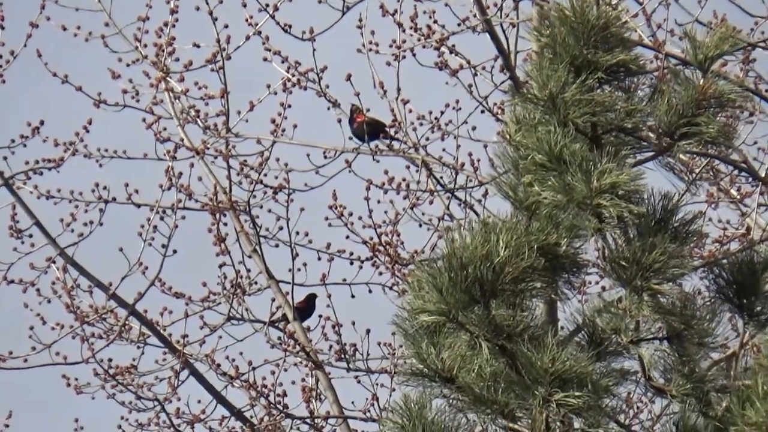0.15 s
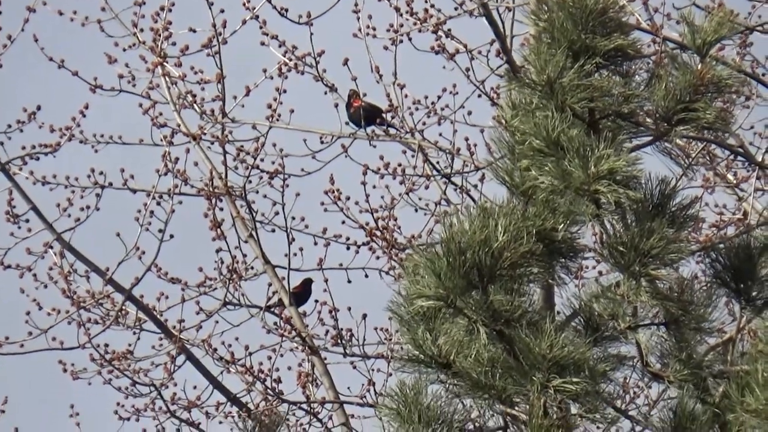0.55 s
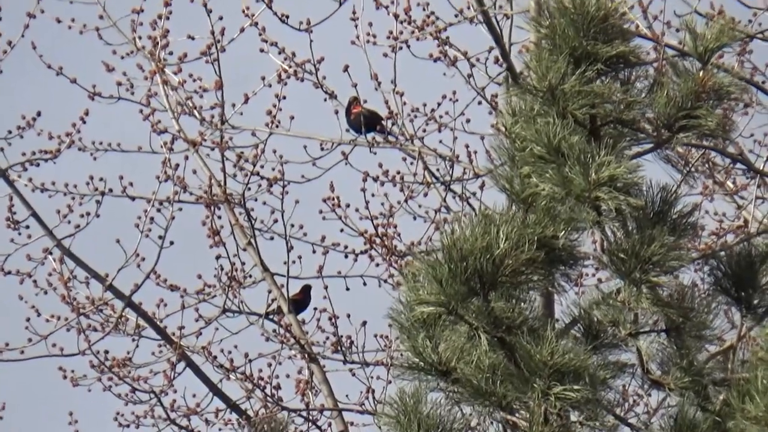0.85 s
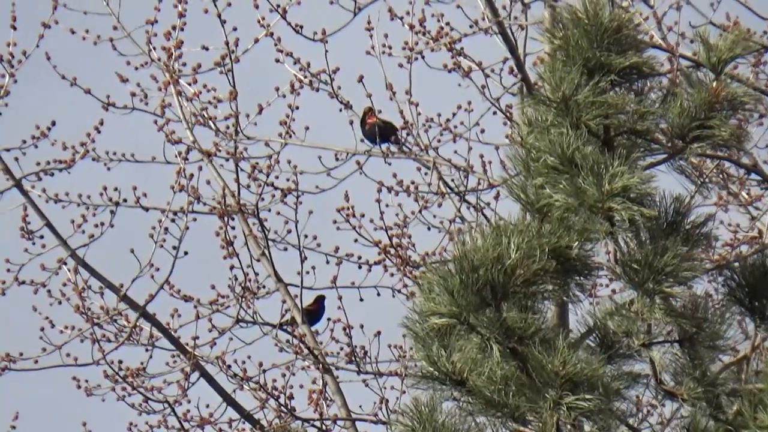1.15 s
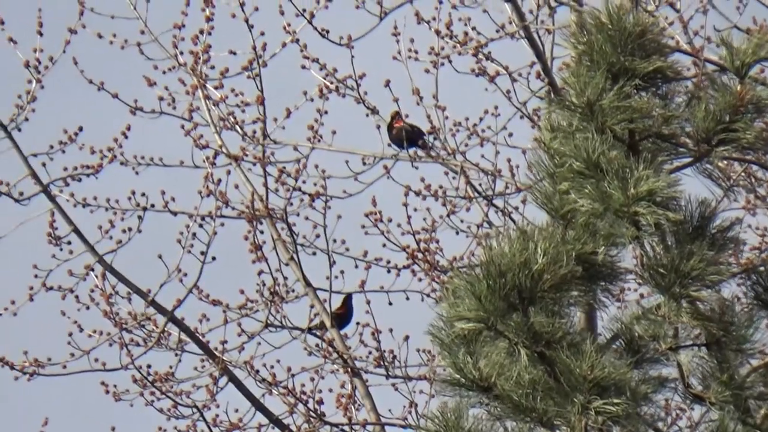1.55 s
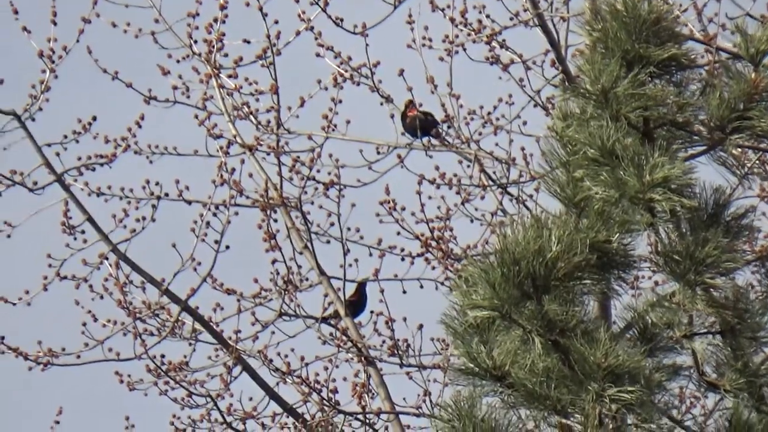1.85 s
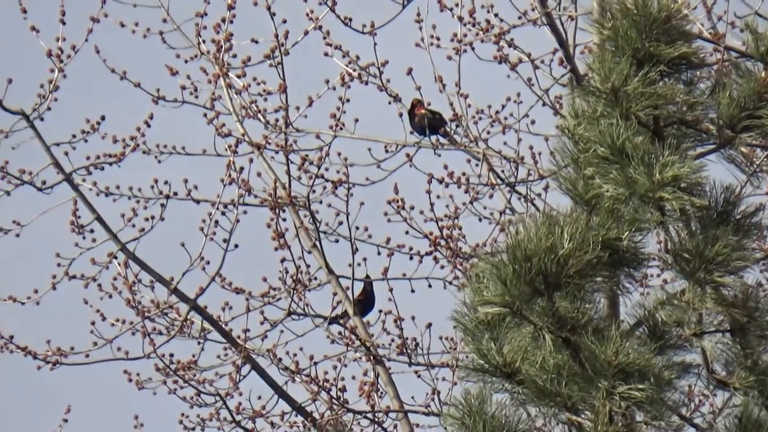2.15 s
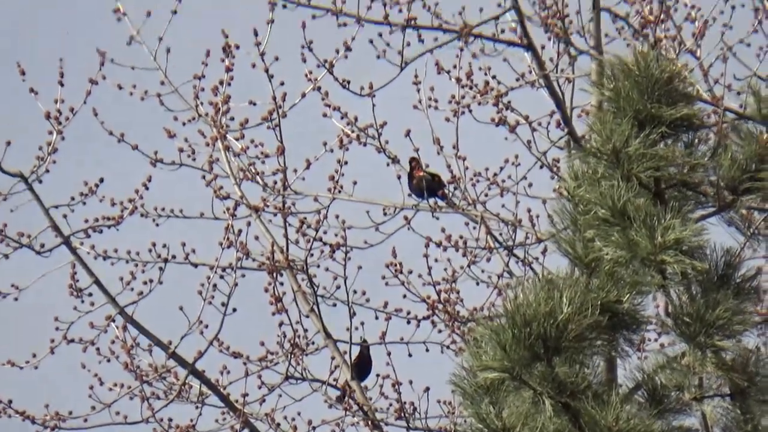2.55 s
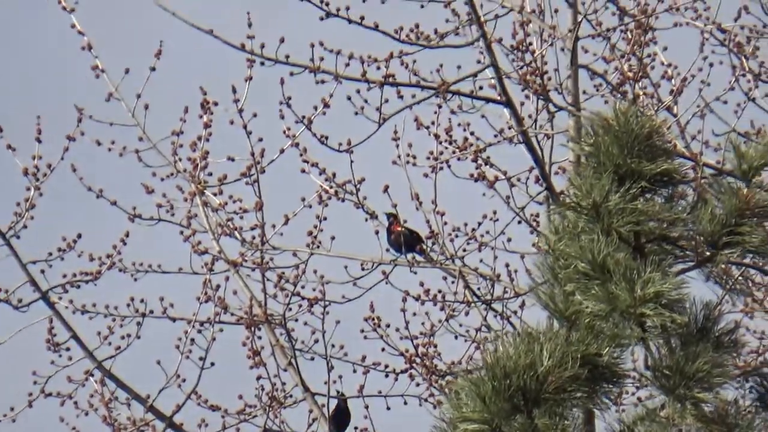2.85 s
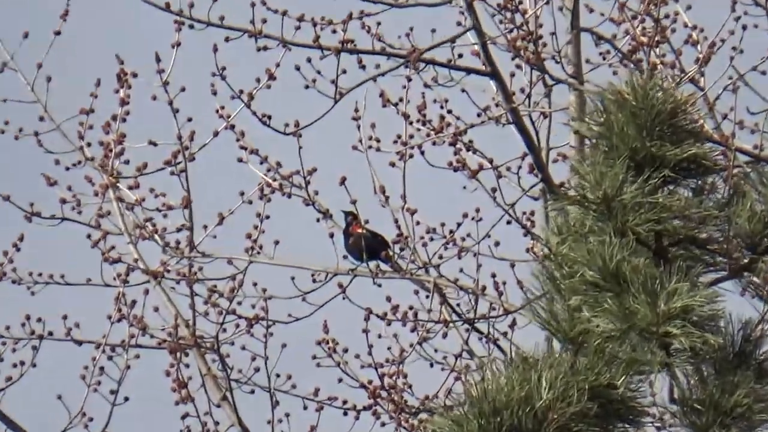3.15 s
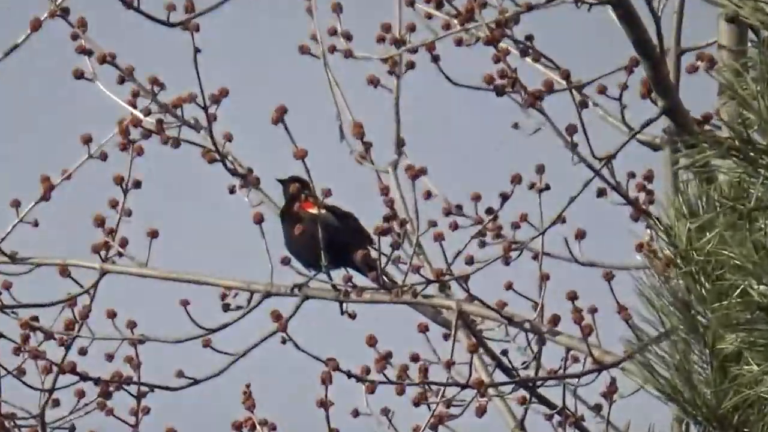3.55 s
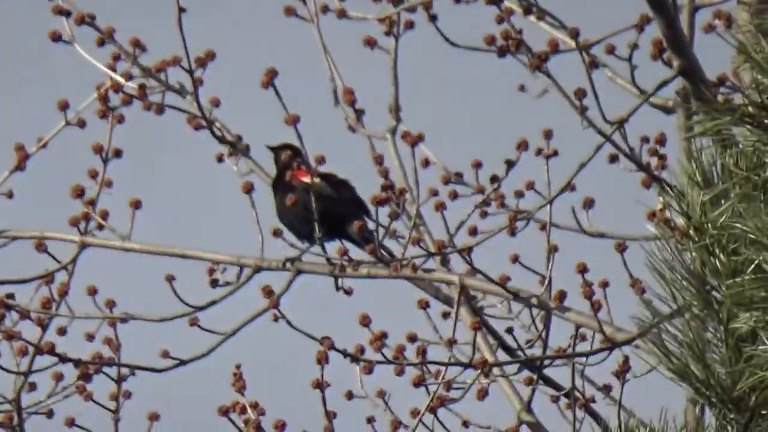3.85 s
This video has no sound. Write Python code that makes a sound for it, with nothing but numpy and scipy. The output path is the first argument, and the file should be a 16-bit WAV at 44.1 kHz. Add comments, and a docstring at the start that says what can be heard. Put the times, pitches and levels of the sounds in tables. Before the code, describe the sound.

A blackbird's buzzy trill ends abruptly, leaving faint distant traffic, a dry chuck and tiny clicks.

```python
"""A bare tree with a town around it: a red-winged blackbird ends its song, a little left of centre.
Quick glides lead to a buzzing trill of two swooping tones, coloured by close reflections and a faint tail.
Later come a dry chuck, a faint far call from a second bird and the start of a whistle, all gliding tones.
Shaped noise makes the traffic fading on the right, swelling tyres, rumble, hiss, thin whine and wind puffs.
A hand-held camera ticks a few times: decaying noise cracks, each with one broad ring."""
import sys
import numpy as np
from scipy import signal
from scipy.fft import rfft, irfft
from scipy.io import wavfile

SR = 44100
rng = np.random.default_rng(int(sys.argv[2]) if len(sys.argv) > 2 else 0)


def transcribe(u):
    """Save the signal u as a 16-bit wav file named by the first command-line argument.

    u: samples, shape (n,) or (channels, n), limited to [-1, 1]; the rate is SR.
    q: integer samples, one column per channel.
    """
    v = np.clip(np.atleast_2d(u).T, -1, 1)
    q = np.round(v * 32767).astype(np.int16)
    wavfile.write(sys.argv[1], SR, q)


N = 176400
TIME = np.arange(N) / SR  # s

# Town rumble: fader (t/s, level/dB), spectrum (f/Hz, level/dB), width (f/Hz, side-to-mid level/dB)
RUMBLE_LEVEL = [(0, -51), (.6, -50.5), (1.2, -54), (2, -54), (2.6, -54), (3.3, -54.5), (4, -53.5)]
RUMBLE_SPECTRUM = [(18, -72), (30, -36), (74, -14), (151, -9), (193, -3), (263, -3), (344, -6), (429, -9.5),
                   (816, -9.5), (1240, -11.5), (1330, -12), (1980, -15), (6000, -32), (7800, -48),
                   (13200, -120)]
RUMBLE_WIDTH = [(100, -18), (300, -18), (1000, -12), (4000, 1)]

# Microphone hiss: fader (t/s, level/dB), spectrum (f/Hz, level/dB), width (f/Hz, side-to-mid level/dB)
HISS_LEVEL = [(0, -55.5), (.7, -62), (1.3, -62.5), (1.9, -64.5), (2.6, -66.5), (3.1, -64.5), (3.4, -67),
              (3.7, -63), (4, -67.5)]
HISS_SPECTRUM = [(1000, -14.5), (3500, 2), (5500, -0.5), (7300, 2.5), (7900, 3), (9000, 3), (11000, -1.5),
                 (13000, -4), (15800, -6.5)]
HISS_WIDTH = [(3000, -17), (8000, -4.5), (11000, -37)]

# Thin camera whine, a narrow band: spectrum (f/Hz, level/dB)
WHINE_SPECTRUM = [(7400, -40), (7800, -6), (7900, 0), (8000, -6), (8400, -40)]
WHINE_DB = -79

# Distant traffic: fader (t/s, level/dB), spectrum (f/Hz, level/dB)
TRAFFIC_LEVEL = [(0, -50), (.5, -47.5), (.9, -48), (1.3, -50), (1.65, -52), (1.95, -54.5), (2.2, -55),
                 (2.6, -57.5), (3.2, -59.5), (3.6, -62), (4, -59)]
TRAFFIC_SPECTRUM = [(60, -15), (200, 1), (400, -1.5), (750, 3.5), (1150, -2), (1600, -12), (2200, -21.5),
                    (3500, -23.5), (6000, -26), (15000, -80)]
# Traffic placement: balance (f/Hz, left-to-right level/dB)
TRAFFIC_BALANCE = [(200, -0.5), (400, -2), (700, -1.5), (1250, -13), (2400, -29), (5000, -1)]
# Width of traffic and tyres: (f/Hz, side-to-mid level/dB)
ROAD_WIDTH = [(200, -25), (500, -11.5), (1000, -8.5), (4000, -0.5)]
TRAFFIC_WAVER_DB, TRAFFIC_WAVER_HZ = 0.38, 20  # spread and smoothing corner of the level waver

# Tyre noise swelling as cars pass: fader (t/s, level/dB), spectrum (f/Hz, level/dB)
TYRE_LEVEL = [(0, -61), (.7, -73), (1.1, -58), (1.65, -56), (1.95, -61.5), (2.15, -53), (2.45, -58.5),
              (2.8, -62.5), (3.5, -76), (4, -64)]
TYRE_SPECTRUM = [(300, -53), (800, -13.5), (1000, 0.5), (1160, 4), (1400, -5.5), (2000, -8), (2800, -51.5),
                 (8000, -44)]
TYRE_PAN_DB = -1.5  # left relative to right

# Wind puffs on the microphone: (t/s, half length/s, level/dB)
WIND_PUFFS = [(0.236, 0.048, -53.5), (.88, 0.048, -57.5), (1.181, 0.021, -51), (2.033, 0.037, -68),
              (2.7, 0.059, -61.5), (3.535, 0.033, -65.5), (3.645, 0.042, -59), (3.757, 0.014, -48.5)]
# Low tone of the puffs: spectrum (f/Hz, level/dB)
PUFF_SPECTRUM = [(20, -29), (50, -17), (85, -5.5), (125, -1), (180, -19), (400, -38), (2000, -80)]

# Camera ticks: (t/s, level/dB before the high cut, ring f/Hz, 60 dB decay/s)
CAMERA_TICKS = [(.7898, -36, 7900, .008), (1.3995, -39.5, 4800, .014), (1.465, -40, 4600, .014),
                (2.889, -46, 1600, .04), (2.956, -53, 4500, .025), (3.707, -53, 6500, .03)]
# Tone of the cracks: spectrum (f/Hz, level/dB)
TICK_SPECTRUM = [(300, -10), (2000, 1), (3500, -0.5), (10500, -3), (12500, -8), (16000, -3)]
TICK_RING_DB, TICK_RING_WIDTH_HZ = -4, 1200

# Far call of a second bird, dry: (t/s, length/s, start f/Hz, end f/Hz, level/dB)
FAR_GLIDES = [(3.652, .078, 2410, 2380, -60)]
# Whistles, dry: (t/s, length/s, start f/Hz, end f/Hz, level/dB)
WHISTLE_GLIDES = [(3.815, .085, 1250, 1260, -59), (3.928, .034, 2430, 2500, -41.5),
                  (3.945, .048, 2540, 2530, -44.5), (3.975, .035, 2390, 2370, -51),
                  (3.945, .03, 3790, 3810, -64)]
# Chuck in short rough strokes, dry: (t/s, length/s, start f/Hz, end f/Hz, level/dB)
CHUCK_GLIDES = [(2.003, 0.011, 3650, 3880, -45), (2.007, 0.0063, 4200, 4400, -36),
                (2.016, 0.0088, 4650, 4140, -38), (2.007, 0.015, 3060, 3100, -48),
                (2.02, 0.0175, 3950, 3560, -47.5), (2.024, .02, 4450, 4280, -52)]
# Opening glides of the song, before beak colour: (t/s, length/s, start f/Hz, end f/Hz, level/dB)
OPENING_GLIDES = [(-.004, 0.026, 2720, 2465, -36.5), (-.004, 0.024, 5200, 5200, -38.5),
                  (.018, 0.0071, 4640, 5530, -27), (.024, 0.0083, 3550, 3410, -25.5),
                  (.0315, .0045, 6000, 3180, -23.5), (.034, 0.0067, 3500, 4100, -32),
                  (.0415, .004, 5400, 3300, -24), (.045, 0.0053, 4500, 5290, -30),
                  (.0495, 0.00345, 5500, 3150, -20), (.052, 0.0053, 4900, 4440, -36),
                  (.028, 0.037, 2670, 2810, -41)]

# Upper voice in one trill note: (share of the cycle, f/Hz before the arch, relative level/dB)
UPPER_VOICE = [(0, 5476, -14), (.09, 5343, -2), (.14, 4485, 2.5), (.19, 3293, -4), (.24, 4706, -1),
               (.43, 5207, -4), (.52, 4380, 0), (.6, 3438, -3.5), (.7, 2607, -11.5), (.79, 2921, 4),
               (.87, 3592, -2.5), (.93, 4995, -4)]
# Lower voice in the same note: (share of the cycle, f/Hz, relative level/dB)
LOWER_VOICE = [(.03, 2884, 3), (.15, 2830, -43), (.3, 2536, -6), (.42, 2972, -12.5), (.57, 2722, -8.5),
               (.7, 2358, -9.5), (.86, 2416, -23), (.96, 2753, -4.5)]
# Song contour: (t/s, upper-voice pitch shift/semitones, relative level of both voices/dB)
SONG_ARCH = [(.06, -.6, 0), (.13, -.4, -1), (.2, .4, 0.5), (.3, 0.16, 0.5), (.43, -.1, -.5),
             (0.529, .1, 1.3), (0.618, -0.35, -0.5)]
TRILL_START_S, TRILL_END_S, ATTACK_S, RELEASE_S = .0564, 0.6357, 0.0049, 0.029
TRILL_RATE_HZ, SLOWING_HZ_PER_S = 68.67, 6.55  # note rate at the start and how fast it falls
TRILL_DB = -27  # base level, before contour and beak colour
UPPER_JITTER, LOWER_JITTER = .012, 0.0348  # pitch spread, share of the pitch
TIMING_JITTER, FLUTTER_DB = .008, 1.2  # spread of the timing in cycles, and of the level
SECOND_DB, THIRD_DB = -27, -27  # overtones relative to the fundamental
TRILL_RASP_DB = -30  # noise gain, before its own colour

# Beak colour of the song: equaliser (f/Hz, level/dB)
BEAK_COLOUR = [(1500, -28), (2150, 3), (2400, 2), (2800, -2), (3500, 1), (4100, -5.5), (4800, -3.5),
               (5280, -3.5), (5600, -3.5), (6200, -3), (6900, 0), (7900, -11.5), (9100, 5), (10200, -11.5),
               (12500, -30), (15000, -10)]
# Close reflections from the branches: (delay/s, linear gain)
BRANCH_ECHOES = [(0.000793, 0.21), (0.00106, 0.33), (0.001759, 0.22), (0.002498, 0.21), (0.003706, 0.09),
                 (0.004339, 0.12), (0.005972, 0.33), (0.006286, 0.13), (0.007394, 0.15), (0.007666, 0.13),
                 (0.008813, 0.12)]
SONG_PAN_DB = 3.5  # left relative to right
SCATTER_T60_S, TAIL_T60_S = .05, 0.39  # 60 dB decays

CUTOFF_HZ = 15900


def from_db(db):
    """Turn decibels into linear gain."""
    return 10 ** (np.asarray(db) / 20)


def rms_one(x):
    """Scale to unit power."""
    return x / np.sqrt(np.mean(x ** 2) + 1e-20)


def curve(rows):
    """Draw a fader move, straight in decibels between its points."""
    return from_db(np.interp(TIME, *np.transpose(rows)))


def gains(points):
    """Draw an equaliser curve, straight in decibels over log frequency."""
    hz, db = np.transpose(points)
    bins_hz = np.arange(N // 2 + 1) * SR / N
    return from_db(np.interp(np.log(bins_hz + 1), np.log(hz), db))  # +1 keeps the log finite at zero


def colour(x, points):
    """Equalise a sound by weighting its spectrum."""
    return irfft(rfft(x) * gains(points), N)


def drift(rate_hz):
    """Smooth random motion of unit spread: noise through two equal one-pole low-passes."""
    pole = np.exp(-2 * np.pi * rate_hz / SR)
    noise = rng.standard_normal(N + SR)
    smooth = signal.lfilter([1], [1, -2 * pole, pole * pole], noise)
    return rms_one(smooth[SR:])  # drop the first second, while the filter settles


def stereo_noise(spectrum, width):
    """Unit-power noise with mid and side parts, so its width changes with frequency."""
    mid, side = colour(rng.standard_normal((2, N)), spectrum)
    side = colour(side, width)
    return rms_one(np.array([mid + side, mid - side]))


def pan(db):
    """Place a sound by splitting a level difference between left and right."""
    return from_db(np.array([[db / 2], [-db / 2]]))


def gate(start, end, attack, release):
    """Open and close a sound on sine-squared ramps."""
    ramp = np.minimum((TIME - start) / attack, (end - TIME) / release)
    return np.sin(np.pi / 2 * np.clip(ramp, 0, 1)) ** 2


def rumble():
    """The town's low rumble as coloured noise, nearly central in the lows and wider in the highs."""
    return curve(RUMBLE_LEVEL) * stereo_noise(RUMBLE_SPECTRUM, RUMBLE_WIDTH)


def hiss():
    """Thin microphone hiss as bright noise under a moving fader."""
    return curve(HISS_LEVEL) * stereo_noise(HISS_SPECTRUM, HISS_WIDTH)


def whine():
    """A narrow, steady band of noise high in the hiss, equal in both channels."""
    return from_db(WHINE_DB) * rms_one(colour(rng.standard_normal(N), WHINE_SPECTRUM))


def traffic():
    """Distant traffic as mostly low noise, fading and wavering, leaning right by frequency."""
    lean = np.sqrt(gains(TRAFFIC_BALANCE))
    spectrum = rfft(stereo_noise(TRAFFIC_SPECTRUM, ROAD_WIDTH))
    placed = irfft(spectrum * np.array([lean, 1 / lean]), N)
    waver = from_db(TRAFFIC_WAVER_DB * drift(TRAFFIC_WAVER_HZ))
    return curve(TRAFFIC_LEVEL) * waver * placed


def tyres():
    """A band of tyre noise swelling from the road on the right."""
    return pan(TYRE_PAN_DB) * curve(TYRE_LEVEL) * stereo_noise(TYRE_SPECTRUM, ROAD_WIDTH)


def wind():
    """Light wind on the microphone: low noise in soft bell-shaped puffs."""
    level = sum(from_db(db) * np.exp(-((TIME - s) / half) ** 2) for s, half, db in WIND_PUFFS)
    return level * stereo_noise(PUFF_SPECTRUM, [(50, -21), (200, -5)])


def ticks():
    """Small plastic contacts: a quickly dying noise crack excites one broad resonance."""
    out = 0
    pole = np.exp(-np.pi * TICK_RING_WIDTH_HZ / SR)
    for s, db, hz, t60 in CAMERA_TICKS:
        noise = rms_one(colour(rng.standard_normal(N), TICK_SPECTRUM))
        resonance = [1, -2 * pole * np.cos(2 * np.pi * hz / SR), pole * pole]
        ring = rms_one(signal.lfilter([1, 0, -1], resonance, noise))
        # High cut dulls the crack above twice the ring pitch
        high_cut = signal.butter(4, min(2 * hz, .45 * SR), fs=SR, output="sos")
        crack = signal.sosfilt(high_cut, noise)
        decay = from_db(db - 60 * np.clip(TIME - s, 0, 5 * t60) / t60)
        out = out + (TIME >= s) * decay * (crack + from_db(TICK_RING_DB) * ring)
    return out


def syrinx(hz, rough, rasp_db):
    """The bird's voice organ: a nearly pure, unsteady tone with weak overtones and a little rasp."""
    unsteady_hz = hz * (1 + rough * drift(250))
    phase = 2 * np.pi * (np.cumsum(unsteady_hz) / SR + rng.random())
    rasp = colour(rng.standard_normal(N), [(1500, -10), (3000, 24), (7000, 7.5), (16000, -9)])
    overtones = from_db(SECOND_DB) * np.sin(2 * phase) + from_db(THIRD_DB) * np.sin(3 * phase)
    return np.sin(phase) + overtones + from_db(rasp_db) * rasp


def glides(rows, rough, rasp_db):
    """Short gated syrinx notes that slide in a straight line between two pitches."""
    out = 0
    for s, length, start_hz, end_hz, db in rows:
        hz = np.interp(TIME, [s, s + length], [start_hz, end_hz])
        envelope = gate(s, s + length * 1.02, length * 0.32, length * 0.26)
        out = out + from_db(db) * envelope * syrinx(hz, rough, rasp_db)
    return out


def trees(x, scatter_db, tail_db):
    """Echoes as decaying noise: quick scatter from the twigs and a tail from the trees around."""
    t = TIME[:SR // 2]
    twigs = rng.standard_normal(len(t)) * from_db(-60 * t / SCATTER_T60_S) * (t > .003)
    # A shared part plus a weaker part of its own in each channel
    far_noise = rng.standard_normal(len(t)) + .5 * rng.standard_normal((2, len(t)))
    far = far_noise * from_db(-60 * t / TAIL_T60_S) * (t > .01)
    response = from_db(scatter_db) * rms_one(twigs) + from_db(tail_db) * rms_one(far)
    response = response / np.sqrt(len(t))  # levels become those of the whole echo
    return x + signal.fftconvolve(x[None], response, axes=1)[:, :N]


def far_call():
    """A second bird's single glide, with echoes stronger than the direct sound."""
    return trees(glides(FAR_GLIDES, rough=.025, rasp_db=-21), scatter_db=3.5, tail_db=3)


def whistles():
    """Clean, faint syrinx tones that start a whistle."""
    return trees(glides(WHISTLE_GLIDES, rough=0.0085, rasp_db=-43), scatter_db=-15, tail_db=-11)


def chuck():
    """A dry chuck from overlapping short strokes with rough pitch."""
    return trees(glides(CHUCK_GLIDES, rough=.035, rasp_db=-20), scatter_db=-9, tail_db=-12)


def trill():
    """Both voices of the syrinx repeat one swooping note fast enough to buzz, slowing slightly."""
    t = TIME - TRILL_START_S
    cycle = TRILL_RATE_HZ * t - SLOWING_HZ_PER_S * t ** 2 / 2 + TIMING_JITTER * drift(41.7)
    s, semitones, swell_db = np.transpose(SONG_ARCH)
    arch = 2 ** (np.interp(TIME, s, semitones) / 12)
    voices = 0
    for note, bend, jitter in ((UPPER_VOICE, arch, UPPER_JITTER), (LOWER_VOICE, 1, LOWER_JITTER)):
        share, hz, db = np.transpose(note)
        level = from_db(np.interp(cycle, share, db, period=1) + FLUTTER_DB * drift(67))
        pitch = bend * np.interp(cycle, share, hz, period=1)
        voices = voices + level * syrinx(pitch, jitter, TRILL_RASP_DB)
    swell = from_db(TRILL_DB + np.interp(TIME, s, swell_db))
    return swell * gate(TRILL_START_S, TRILL_END_S, ATTACK_S, RELEASE_S) * voices


def song():
    """Opening glides and trill, shaped by the beak, then delayed copies from branches and trees."""
    voice = trill() + glides(OPENING_GLIDES, rough=0.029, rasp_db=-24)
    direct = colour(voice, BEAK_COLOUR) * (TIME < 1)
    echoes = sum(gain * np.interp(TIME - delay, TIME, direct, left=0) for delay, gain in BRANCH_ECHOES)
    return pan(SONG_PAN_DB) * trees(direct + echoes, scatter_db=-14, tail_db=-17)


def scene():
    """Sum every layer at the microphone, from the background to the song."""
    background = rumble() + hiss() + whine() + traffic() + tyres()
    handling = wind() + ticks()
    return background + handling + far_call() + whistles() + chuck() + song()


def record(dry):
    """Cut the top steeply with an elliptic low-pass."""
    low_pass = signal.ellip(12, .1, 70, CUTOFF_HZ, fs=SR, output="sos")
    return signal.sosfilt(low_pass, dry)


dry = scene()
out = record(dry)
transcribe(out)
```